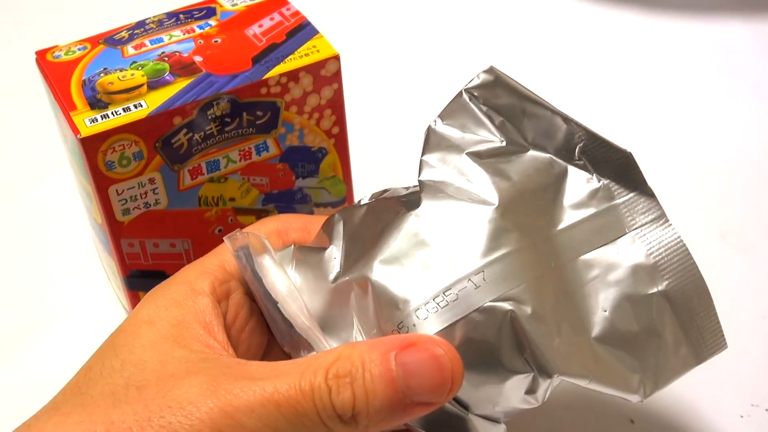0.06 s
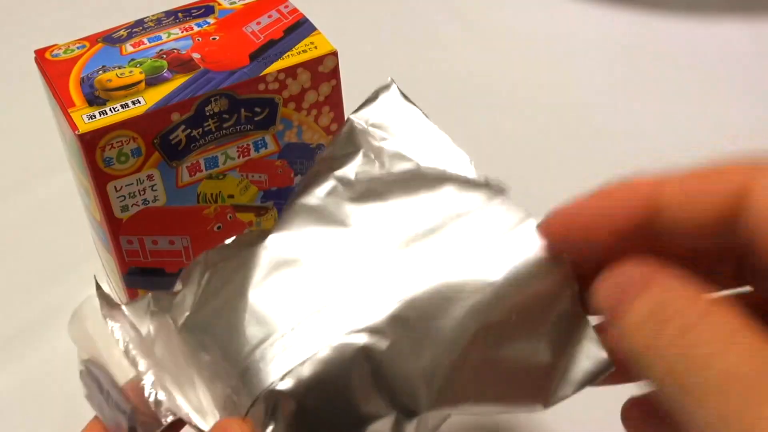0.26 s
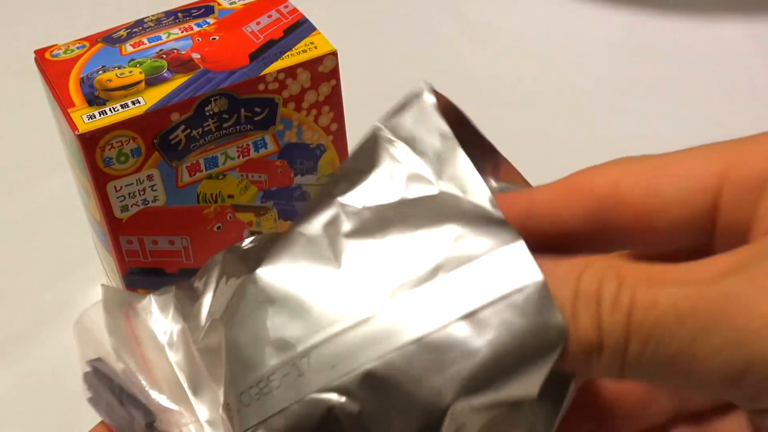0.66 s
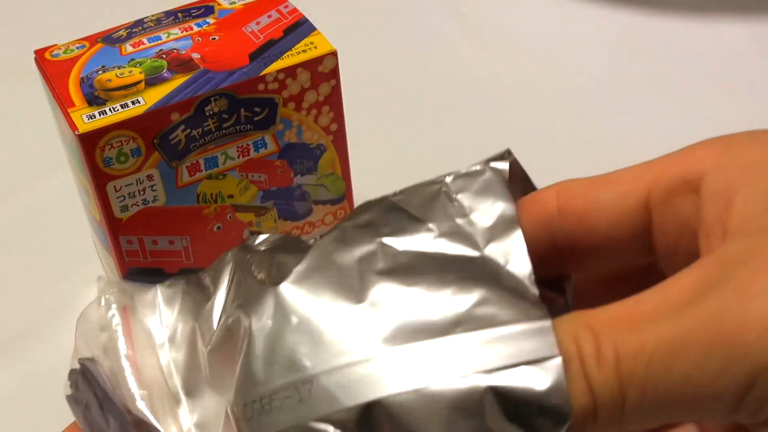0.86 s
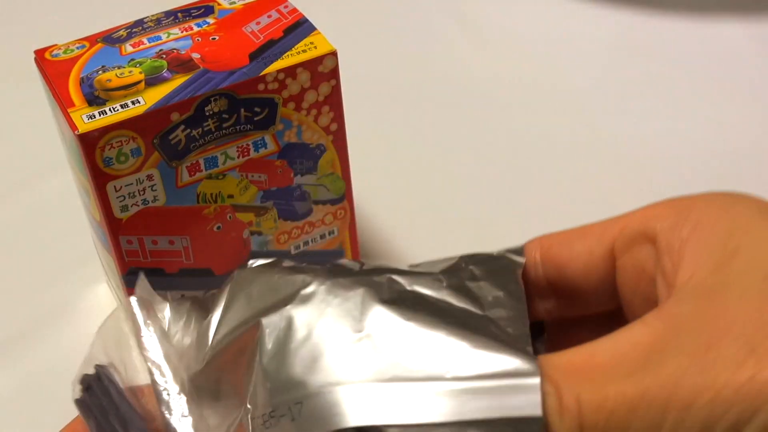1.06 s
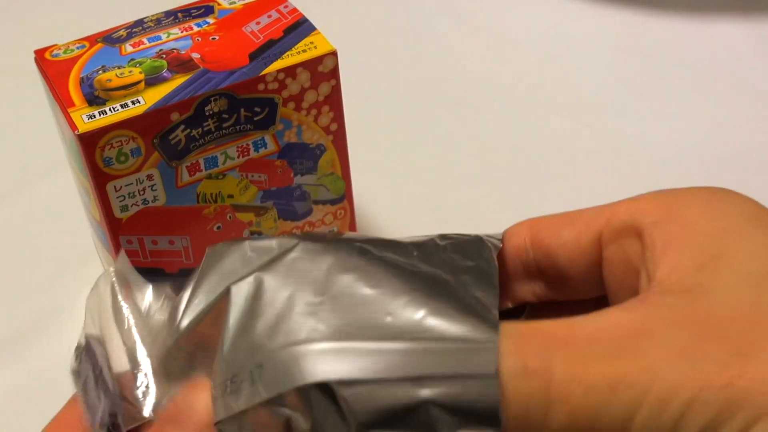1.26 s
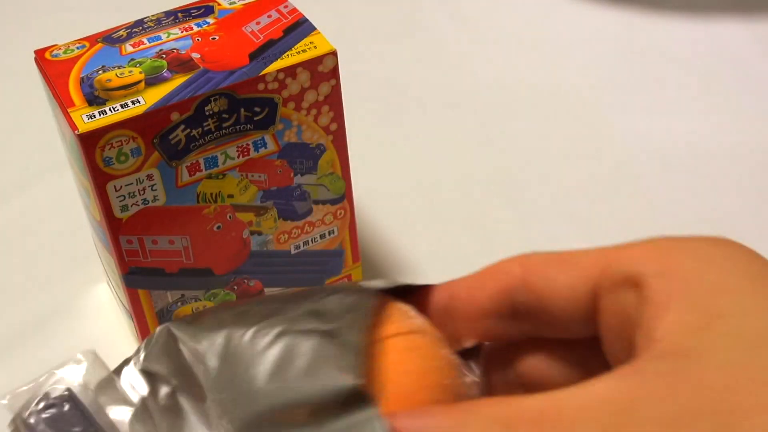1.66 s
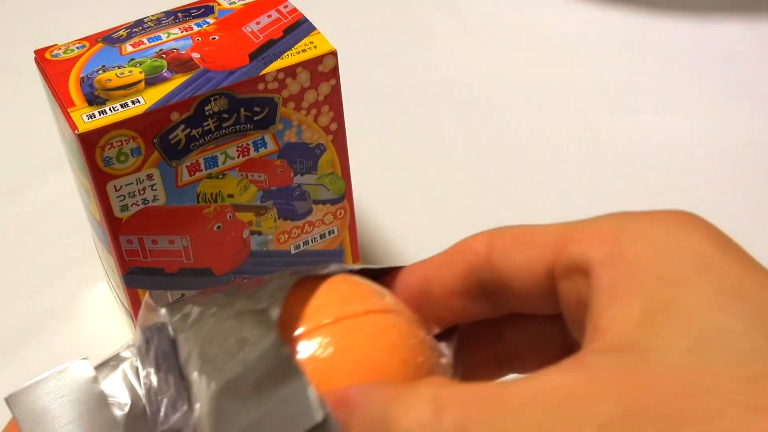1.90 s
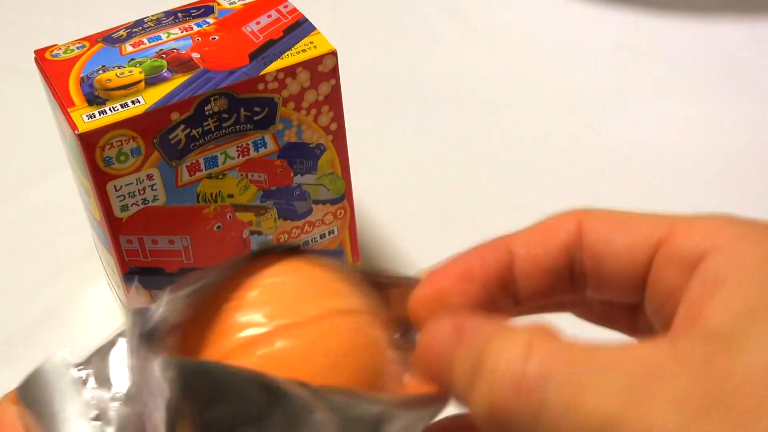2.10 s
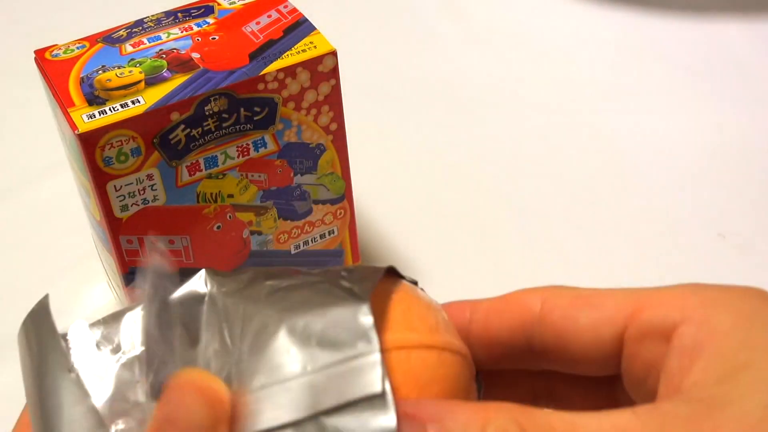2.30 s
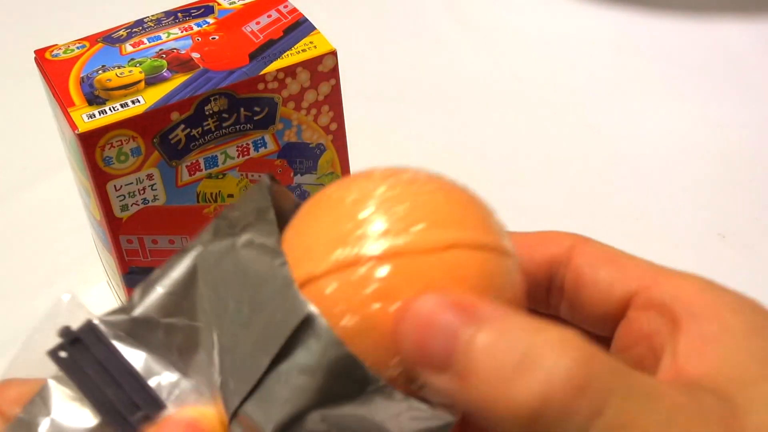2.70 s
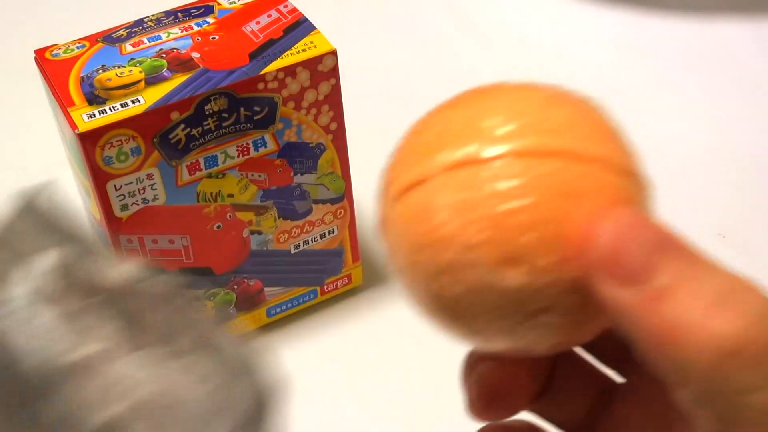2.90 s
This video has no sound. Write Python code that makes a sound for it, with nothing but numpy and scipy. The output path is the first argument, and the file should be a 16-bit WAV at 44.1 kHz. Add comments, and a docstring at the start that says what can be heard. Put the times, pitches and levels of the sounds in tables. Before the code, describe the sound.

Dense, irregular crinkling of a foil packet handled by fingers in a quiet room.

```python
"""Hands work a plastic-wrapped ball out of a foil packet, close to the microphone in a small room.
Over the room's low hush, creases start to snap, each with a crack and a brief ring of the foil beside it.
Countless tiny creases crackle in between, and fingers bump and scrape the packet. Early on, its wall pops
through with three hollow knocks. The snapping goes on, with one more knock near the end, then the crackle
fades. The room answers it all with a soft, short echo."""
import sys
import numpy as np
from scipy import signal
from scipy.fft import rfft, irfft, next_fast_len
from scipy.io import wavfile

SR = 44100
rng = np.random.default_rng(int(sys.argv[2]) if len(sys.argv) > 2 else 0)


def wav_record(signal):
    """Record a signal, one row per channel, as 16-bit PCM in the file named by sys.argv[1]."""
    frames = np.transpose(np.atleast_2d(signal))
    bounded = np.clip(frames, -1, 1)
    # unit amplitude maps onto the largest positive 16-bit level
    quanta = np.round(bounded * 32767).astype(np.int16)
    wavfile.write(sys.argv[1], SR, quanta)


N = 134505
BUCKLE_S = 0.000098  # time a crease takes to flip
RADIATE_HZ = 298  # below this pitch the foil gives off little sound


def undb(db):
    """Turn decibels into a factor to multiply by."""
    return 10 ** (np.asarray(db) / 20)


def unit(x):
    """Scale a sound to an average (rms) level of 1."""
    return x / np.sqrt(np.mean(x ** 2) + 1e-20)


def curve(rows, column=1):
    """Loudness over time, gliding between the dB values in one column of a table."""
    rows = np.array(rows)
    return undb(np.interp(np.arange(N) / SR, rows[:, 0], rows[:, column]))


def colour(x, points):
    """Make some pitches louder and others softer, following rows of f/Hz, level/dB."""
    size = next_fast_len(len(x) + 8192) * 2
    hz, db = np.array(points, float).T
    f = np.maximum(np.fft.rfftfreq(size, 1 / SR), 1)
    gain = undb(np.interp(np.log(f), np.log(hz), db))
    # folding the cepstrum keeps the filter from ringing before a sound starts
    cepstrum = irfft(np.log(gain))
    cepstrum[1:size // 2] *= 2
    cepstrum[size // 2 + 1:] = 0
    return irfft(rfft(x, size) * np.exp(rfft(cepstrum)))[:len(x)]


def keep_pitches(x, kind, edges_hz):
    """Let through the pitches between two edges ("band") or above one ("high")."""
    return signal.sosfilt(signal.butter(3, edges_hz, kind, fs=SR, output="sos"), x)


def add(out, start_s, x):
    """Mix a short sound in at its time."""
    i = max(int(start_s * SR), 0)
    out[i:i + len(x)] += x[:max(len(out) - i, 0)]


def room_tone():
    """The low hush of the room; the sound drops out for an instant near the start, as at an edit."""
    # tone of the hush: f/Hz, level/dB
    tone = [(65, -10), (92, 1.5), (125, 0.5), (400, 0), (2500, -16), (9000, -37), (16000, -20)]
    # volume over time, with the dropout: t/s, level/dB
    volume = [(.15, -58), (.176, -82), (.2, -58), (3.05, -56)]
    return unit(colour(rng.standard_normal(N), tone)) * curve(volume)


def with_followers(rows):
    """Creases give way in clusters: each snap gets a weaker neighbour just before and just after it."""
    shortest_s, longest_s, pitch_spread = .002, .018, 0.31
    s, db, hz, crack_db, sizzle_db = np.repeat(rows, 2, axis=0).T
    wait, strength, pitch = rng.standard_normal((3, len(s)))
    gap_s = shortest_s * (longest_s / shortest_s) ** (.5 + .5 * np.tanh(wait))
    start_s = s + gap_s * np.tile([1, -.5], len(rows))  # the earlier neighbour sits closer
    drop_db = np.minimum(-12, -32 - db) + 3 * strength  # about 12 dB down, more for loud snaps
    near_hz = hz * np.exp(pitch_spread * np.tanh(pitch))
    followers = np.column_stack([start_s, db + drop_db, near_hz, crack_db + drop_db, sizzle_db + drop_db])
    return np.vstack([rows, followers])


def snaps():
    """Each crease flips with a crack and a high sizzle, and rings the flat panel of foil beside it."""
    # snapping creases: t/s, ring level/dB, panel f/Hz, crack level/dB, sizzle level/dB
    creases = [(0.094, -45, 1500, -66, -71), (0.2201, -24.5, 2200, -57, -58), (0.2566, -26, 1670, -39, -37),
               (0.2665, -9.5, 1423, -36, -47), (0.345, -13.5, 2790, -28.5, -26.5),
               (0.3512, -12, 1210, -27, -30), (0.4395, -10, 1830, -29.5, -28.5),
               (0.553, -15.5, 2155, -36, -44), (0.652, -23.5, 2770, -30, -27.5),
               (0.693, -30, 2080, -45, -49), (0.7243, -26.5, 2340, -31, -26),
               (0.7584, -22.5, 1710, -26.5, -31), (0.7596, -24, 600, -35, -50),
               (0.8063, -24, 2180, -34, -38), (0.8235, -19.5, 4220, -62, -35),
               (0.8606, -22, 1960, -31.5, -37.5), (0.8717, -29, 1630, -36, -50),
               (0.88, -22.5, 1590, -28.5, -34), (0.8935, -18.5, 1570, -35, -49),
               (0.9045, -21.5, 2700, -31, -30), (0.9158, -19.5, 3650, -51, -33),
               (0.9529, -26, 2160, -47, -54), (0.9638, -22, 2210, -35, -46),
               (0.9762, -23, 2830, -30.5, -41), (0.9807, -26, 3550, -31.5, -30),
               (0.9874, -19, 1810, -25, -25), (1.0193, -24, 4700, -51, -35), (1.026, -23, 2700, -43, -32),
               (1.0362, -24.5, 2380, -46, -47), (1.052, -27, 2240, -29, -30.5),
               (1.0635, -21, 2330, -48, -53), (1.0712, -25.5, 2500, -29.5, -32),
               (1.0914, -26.5, 2900, -32, -29), (1.0989, -28, 1925, -44, -52),
               (1.1112, -25, 2160, -51, -56), (1.1446, -16.5, 2800, -31, -27), (1.167, -30, 2810, -47, -56),
               (1.1892, -30.5, 1660, -35.5, -57), (1.1983, -24, 2370, -58, -60),
               (1.2193, -18.5, 2510, -26.5, -27.5), (1.331, -28.5, 2530, -42, -48),
               (1.3577, -25, 1690, -54, -58), (1.3671, -24.5, 1520, -34, -42),
               (1.4288, -32.5, 4020, -37, -30.5), (1.4435, -27, 1940, -34, -45),
               (1.4601, -23, 2430, -29.5, -30), (1.4671, -22.5, 3390, -50, -41),
               (1.498, -22, 2050, -28, -30), (1.5075, -22, 3280, -35, -25.5), (1.5191, -20, 2750, -26, -30),
               (1.5396, -30, 3080, -24, -24), (1.5477, -20.5, 2660, -31, -35),
               (1.5831, -22, 1230, -30, -25), (1.5945, -20, 3280, -51, -51),
               (1.61, -23.5, 4920, -31.5, -31), (1.6147, -25, 2960, -43, -39),
               (1.6775, -31.5, 1920, -44, -59), (1.6925, -32, 4600, -33, -38),
               (1.7502, -22, 3450, -38, -54), (1.7645, -28, 3040, -30.5, -32),
               (1.8132, -22.5, 2930, -59, -32.5), (1.8307, -19.5, 4510, -45, -35),
               (1.8754, -27, 1320, -41, -39), (1.8976, -27, 3500, -56, -38), (1.957, -23, 3380, -27.5, -33),
               (2.0207, -22.5, 2800, -35.5, -44), (2.0302, -27, 1950, -42, -46),
               (2.0547, -31, 2720, -44, -48), (2.0787, -27.5, 1840, -46, -51),
               (2.1236, -28.5, 2470, -43, -37.5), (2.142, -27.5, 2350, -41.5, -46),
               (2.188, -23, 2260, -47, -34), (2.2045, -21, 2040, -50, -47),
               (2.2303, -25, 2410, -30.5, -33.5), (2.2368, -21.5, 2080, -39, -50),
               (2.2797, -27, 3120, -29.5, -27.5), (2.2955, -22.5, 3700, -36, -35),
               (2.3466, -26, 2490, -47.5, -34), (2.3823, -25.5, 1900, -33, -43),
               (2.4305, -21.5, 1870, -39.5, -39), (2.4413, -19, 2130, -44, -44),
               (2.5019, -30, 3140, -34, -44), (2.521, -24.5, 3600, -47, -44),
               (2.5256, -20.5, 1980, -24.5, -26), (2.5457, -24, 3570, -35, -33),
               (2.5627, -25, 3280, -44, -47), (2.5758, -22, 2780, -40, -41), (2.5819, -21, 2840, -25, -32),
               (2.5889, -17.5, 2450, -25, -24.5), (2.6384, -27, 2350, -28.5, -35),
               (2.6506, -18, 4120, -46, -32), (2.6898, -24.5, 1500, -34, -50),
               (2.717, -22.5, 2760, -28.5, -30), (2.7843, -25, 1450, -37, -40),
               (2.7942, -28, 1380, -36, -49), (2.8739, -28, 1660, -41, -43)]
    # modes, the tones a panel rings with: ratio to the panel's pitch, level/dB
    panel_modes = [(0.299, -17), (0.478, -8.5), (0.703, -1.5), (0.999, 1.5), (1.42, -1), (1.95, -3.5)]
    crack_s, tail_s, tail_db = .0005, .002, -14
    low_hz, high_hz = 600, 5900  # a panel sounds best between these pitches
    t, out = np.arange(800) / SR, np.zeros(N)
    ratio, mode_db = np.array(panel_modes).T
    scatter = 0.13 * (mode_db < mode_db.max())  # only the strongest mode stays in tune
    flip = 1 - np.exp(-t / BUCKLE_S)
    burst = flip * (np.exp(-t / crack_s) + undb(tail_db) * np.exp(-t / tail_s))

    def at_level(x, db):
        """Set the level of the first 4 ms."""
        return x * undb(db) / np.sqrt(np.mean(x[:176] ** 2))

    for s, ring_db, hz, crack_db, sizzle_db in with_followers(creases):
        crack = keep_pitches(rng.standard_normal(len(t)) * burst, "band", edges_hz=(3700, 7650))
        sizzle = keep_pitches(rng.standard_normal(len(t)) * burst, "band", edges_hz=(9980, 20200))
        detune, weight, sign = rng.standard_normal((3, len(ratio)))
        f = (hz * ratio * np.exp(scatter * detune))[:, None]
        decay_s = 0.0012 * (2050 / f) ** 0.73  # small, high panels die away sooner
        radiation = 1 / np.sqrt((1 + (low_hz / f) ** 2) * (1 + (f / high_hz) ** 6))
        modes = radiation * np.sin(2 * np.pi * f * t) * np.exp(-t / decay_s)
        strengths = np.sign(sign) * undb(mode_db + 2 * weight)
        ring = flip * (strengths @ modes)
        add(out, s, at_level(ring, ring_db) + at_level(crack, crack_db) + at_level(sizzle, sizzle_db))
    return keep_pitches(out, "high", RADIATE_HZ)


def room_echo(x):
    """The close walls send back many reflections that blur into a short tail."""
    # tone of the echo: f/Hz, level/dB
    tone = [(1000, -7.5), (5000, -8)]
    echo_db, fade_s, delay_s = -8.5, 0.37, 0.0033
    t = np.arange(SR // 2) / SR
    tail = rng.standard_normal(len(t)) * undb(-60 * t / fade_s) * (t > delay_s)
    return undb(echo_db) * signal.fftconvolve(x, colour(tail / np.linalg.norm(tail), tone))[:N]


def tiny_creases(centre_hz):
    """A shower of pops of unequal size, each ringing a few cycles at its own pitch."""
    pops_per_s, spread_octaves, decay_cycles = 900, 1.68, 1.2
    count, samples = int(pops_per_s * N / SR), np.arange(256)
    when, strength, pitch_a, pitch_b, sign = rng.random((count, 5)).T[:, :, None]
    hz = np.minimum(centre_hz * 2 ** (spread_octaves * (pitch_a - pitch_b)), SR / 2 - 100)
    db = np.minimum(-4.4 * np.log(1 - strength), 17)  # many weak pops, a few strong ones
    height = np.sign(sign - .5) * undb(db) * np.sqrt(hz)
    cycles = hz * samples / SR
    pops = height * np.sin(2 * np.pi * cycles) * np.exp(-cycles / decay_cycles)
    positions = (when * N).astype(int) + samples
    return unit(np.bincount(positions.ravel(), pops.ravel(), N)[:N])


def crackle():
    """Tiny creases pop and foil rubs on foil, in a full and a bright layer that swell as fingers work."""
    # loudness of the crackle: t/s, full layer level/dB, bright layer level/dB
    loudness = [(0.17, -86, -99), (0.2, -39.5, -50), (0.32, -37, -50), (0.36, -25.5, -43), (0.41, -50, -68),
                (0.45, -30.5, -69), (0.51, -50.5, -55), (0.59, -28.5, -41), (0.71, -57.5, -65),
                (0.76, -34, -50), (0.85, -43.5, -54), (0.89, -25.5, -40), (0.97, -49, -52),
                (0.99, -35.5, -44.5), (1.35, -45, -47.5), (1.38, -32.5, -46), (1.41, -49, -61),
                (1.54, -29.5, -37), (1.68, -47, -56.5), (1.77, -32, -40.5), (1.81, -54, -68),
                (1.83, -30.5, -35), (1.94, -53, -67), (1.97, -43, -51), (2.16, -48.5, -53),
                (2.198, -23, -29), (2.21, -40, -51), (2.36, -34, -34.5), (2.41, -42, -47), (2.44, -30, -44),
                (2.51, -40.5, -60), (2.53, -32, -38), (2.74, -40.5, -49), (2.94, -43, -51.5),
                (2.97, -59, -59)]
    # tone of each layer: f/Hz, level/dB
    full_tone = [(100, -82), (250, -1), (800, 6), (4500, 4.5), (7000, -18), (11000, -65)]
    bright_tone = [(1500, -109), (4000, 15), (6500, 11), (9500, 3), (13000, 9.5)]

    def layer(tone, centre_hz, rub_db):
        pops = unit(colour(tiny_creases(centre_hz), tone))
        rub = unit(colour(rng.standard_normal(N), tone))
        return unit(pops + undb(rub_db) * rub)

    full = layer(full_tone, centre_hz=2034, rub_db=-10) * curve(loudness, column=1)
    bright = layer(bright_tone, centre_hz=8950, rub_db=-1) * curve(loudness, column=2)
    return full + undb(-0.5) * bright


def touches(rows, tone, attack_s):
    """Each touch makes a rubbing noise that rises quickly and dies away."""
    t, envelope = np.arange(N // 4) / SR, np.zeros(N)
    for s, db, decay_s in rows:
        add(envelope, s, undb(db) * np.minimum(t / attack_s, 1) * np.exp(-t / decay_s))
    return envelope * unit(colour(rng.standard_normal(N), tone))


def bumps():
    """The hands bump the packet with dull, low thuds."""
    # bumps: t/s, level/dB, decay/s
    hits = [(.21, -37, 0.034), (.265, -41.5, 0.14), (.351, -42, 0.037), (.44, -45, 0.18),
            (1.546, -38, 0.011), (2.279, -39.5, 0.011)]
    # tone of a bump: f/Hz, level/dB
    tone = [(55, -8.5), (95, 1), (380, 0), (1200, -26)]
    return touches(hits, tone, attack_s=0.001)


def scrapes():
    """Fingers slide across the foil with a short rasp."""
    # finger strokes: t/s, level/dB, decay/s
    strokes = [(.239, -13.5, 0.02), (.562, -26.5, .035)]
    # tone of a scrape: f/Hz, level/dB
    tone = [(88, -54), (150, -19), (1600, 5), (3350, -7.5), (4160, -1), (6000, -21.5), (15100, -16.5)]
    return touches(strokes, tone, attack_s=0.0048)


def knocks():
    """A whole wall of the packet pops through and rings with two tones, the lower one longer."""
    # hollow knocks: t/s, low f/Hz, low level/dB, high f/Hz, high level/dB
    wall_pops = [(0.3515, 445, -14, 780, -10.5), (0.438, 1054, -8, 2870, -9),
                 (0.5541, 530, -22.5, 1860, -11), (2.6901, 1300, -8.5, 3450, -15)]
    t, out = np.arange(SR // 40) / SR, np.zeros(N)
    flip = 1 - np.exp(-t / BUCKLE_S)
    for s, low_hz, low_db, high_hz, high_db in wall_pops:
        for hz, db in (low_hz, low_db), (high_hz, high_db):
            decay_s = 0.0026 * np.sqrt(low_hz / hz)
            add(out, s, undb(db) * flip * np.sin(2 * np.pi * hz * t) * np.exp(-t / decay_s))
    return keep_pitches(out, "high", RADIATE_HZ)


def packet_in_room():
    """The foil and the hands, with the room's hush and echo."""
    foil = snaps() + crackle() + bumps() + scrapes() + knocks()
    return room_tone() + foil + room_echo(foil)


def scene():
    """Left and right hear nearly the same; creases reach each a little differently, most in the treble."""
    # how strong the left-right difference is beside the shared sound: f/Hz, level/dB
    side_tone = [(100, -12.5), (1500, -30), (3200, -23.5), (8000, -4), (13000, -15.5)]
    mid = packet_in_room()
    side = colour(packet_in_room(), side_tone)
    return np.array([mid + side, mid - side])


def record(dry):
    """The recorder rounds off the tallest peaks and cuts the highest pitches."""
    ceiling, top_hz = .9, 15900
    rounded = dry / (1 + (dry / ceiling) ** 4) ** (1 / 4)
    return signal.sosfilt(signal.ellip(10, .2, 70, top_hz, fs=SR, output="sos"), rounded)


dry = scene()
out = record(dry)
wav_record(out)
```